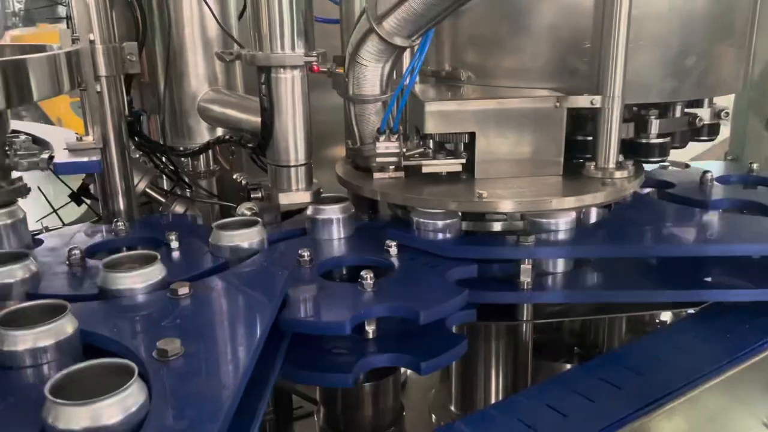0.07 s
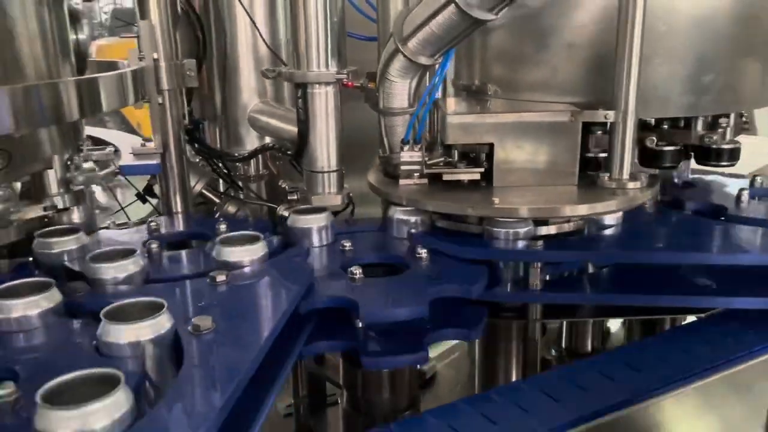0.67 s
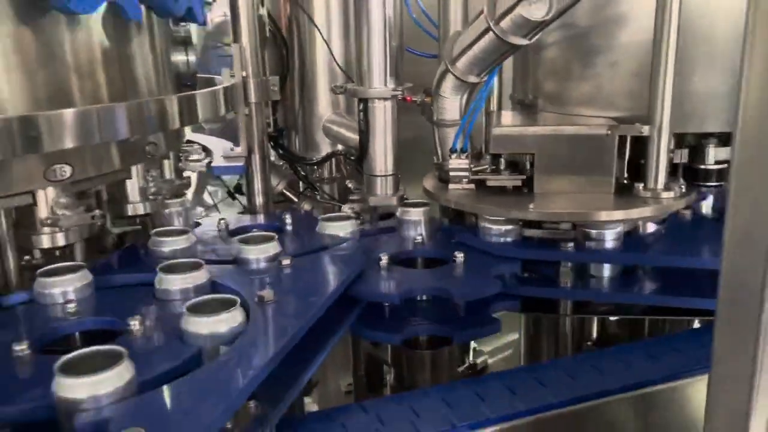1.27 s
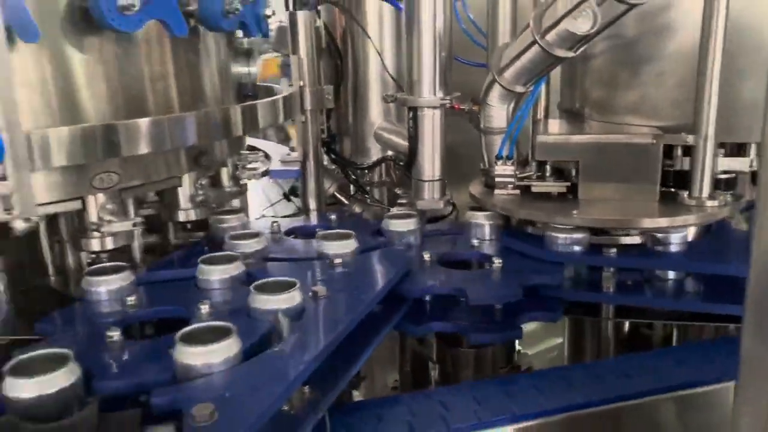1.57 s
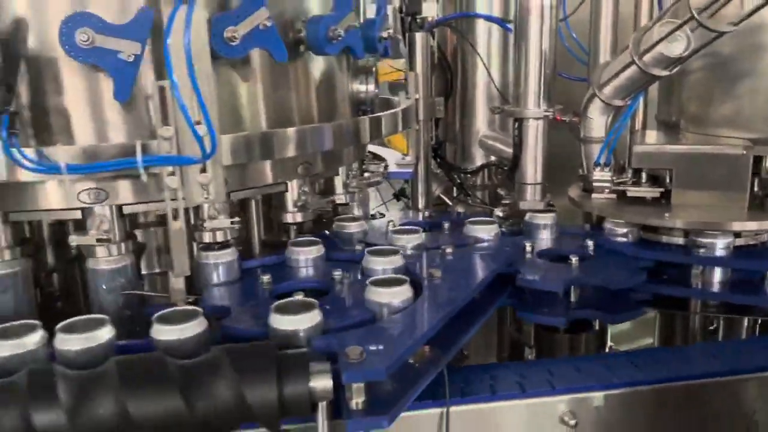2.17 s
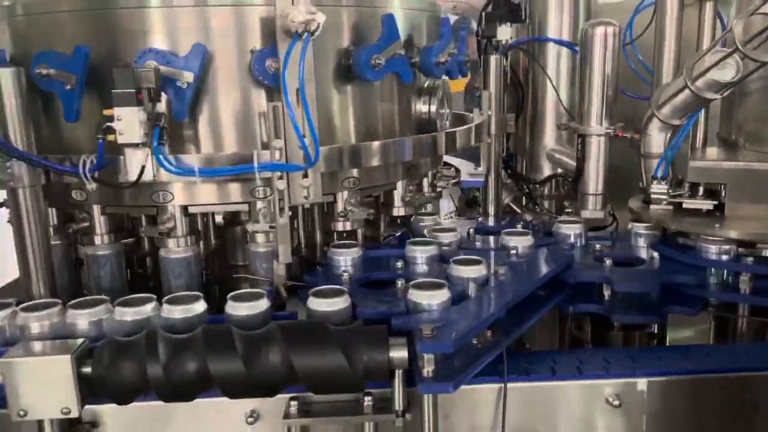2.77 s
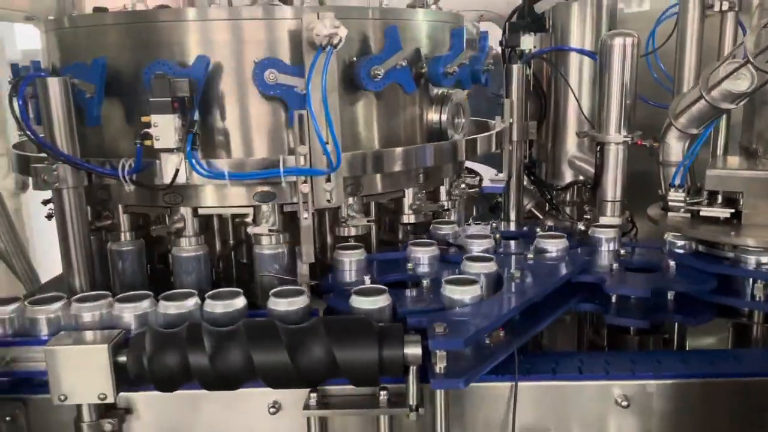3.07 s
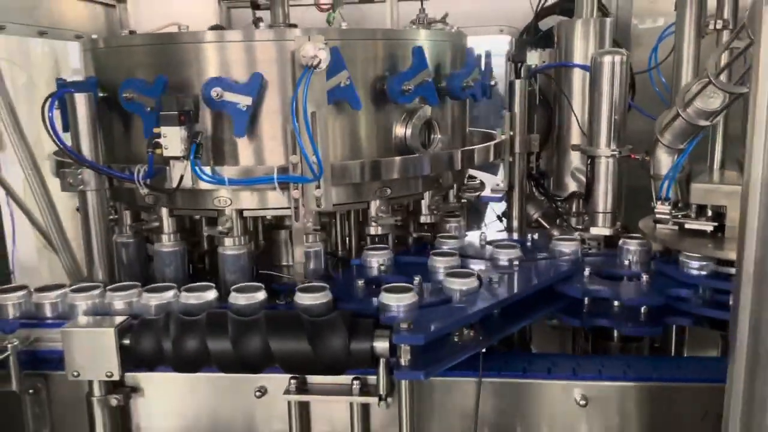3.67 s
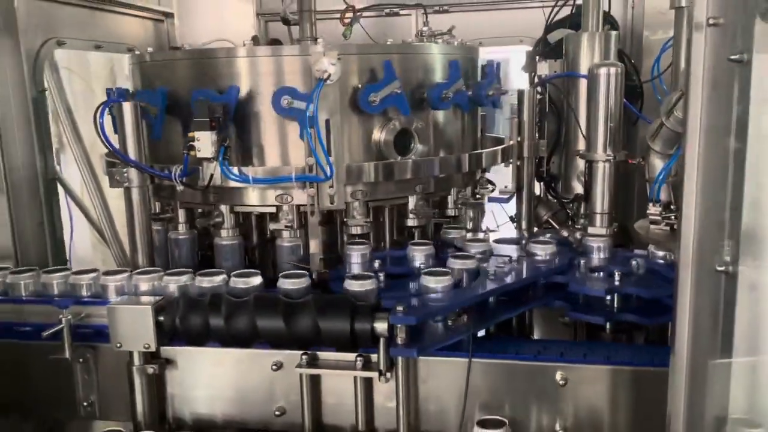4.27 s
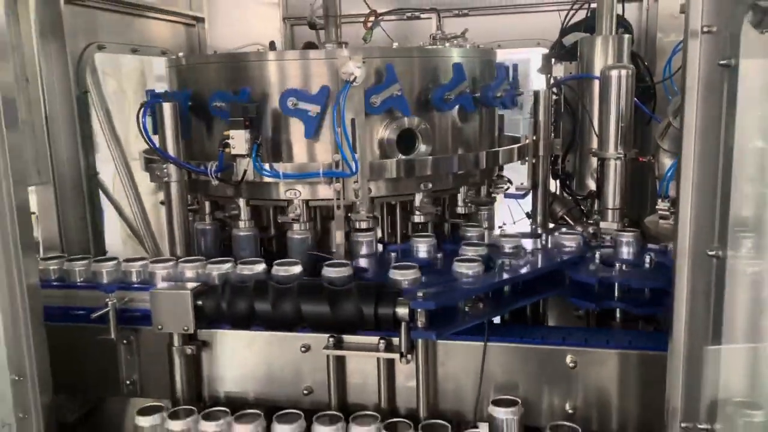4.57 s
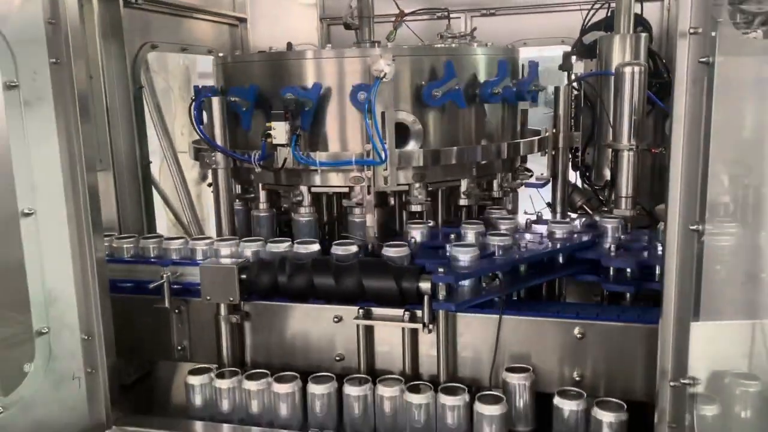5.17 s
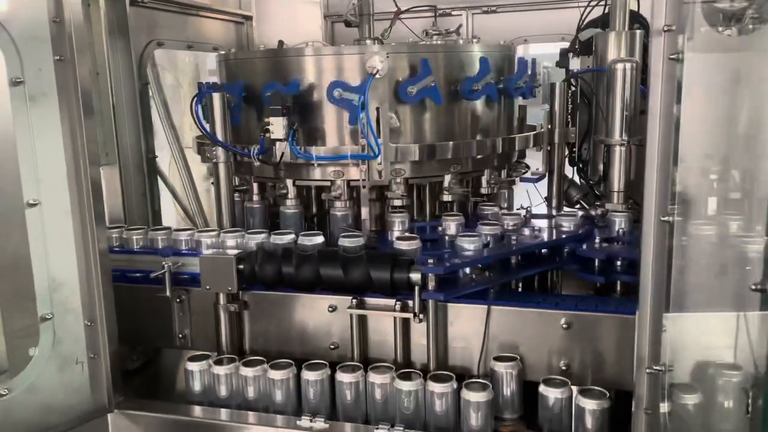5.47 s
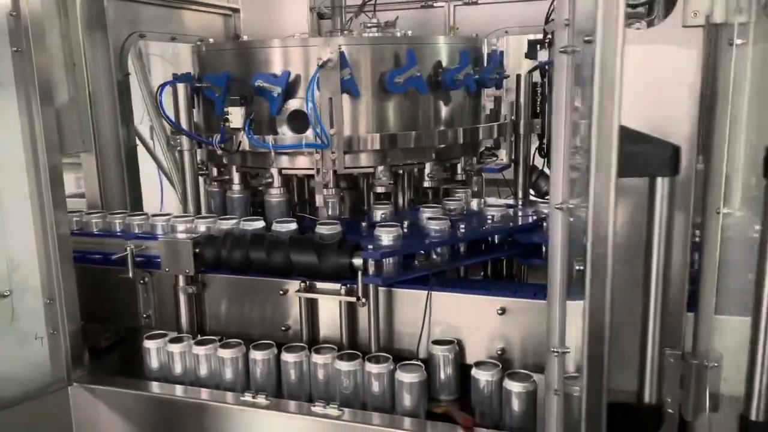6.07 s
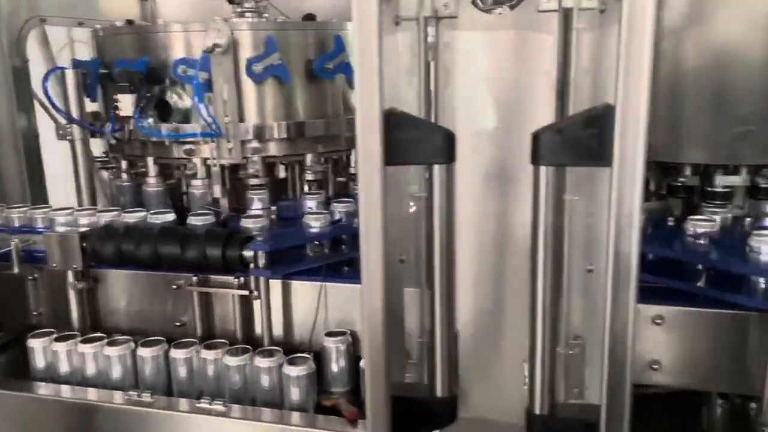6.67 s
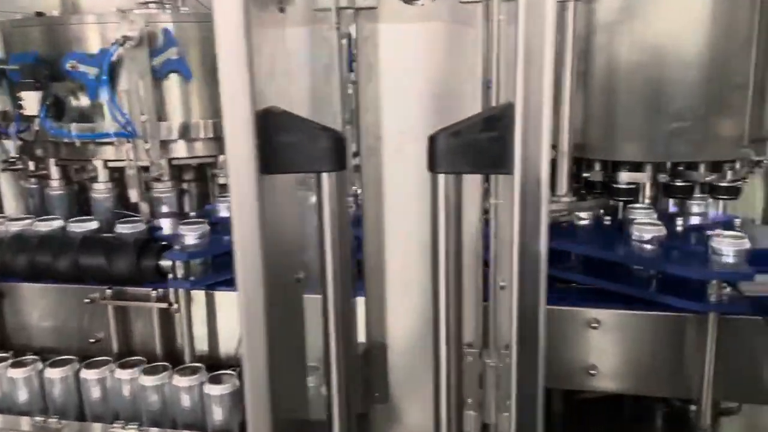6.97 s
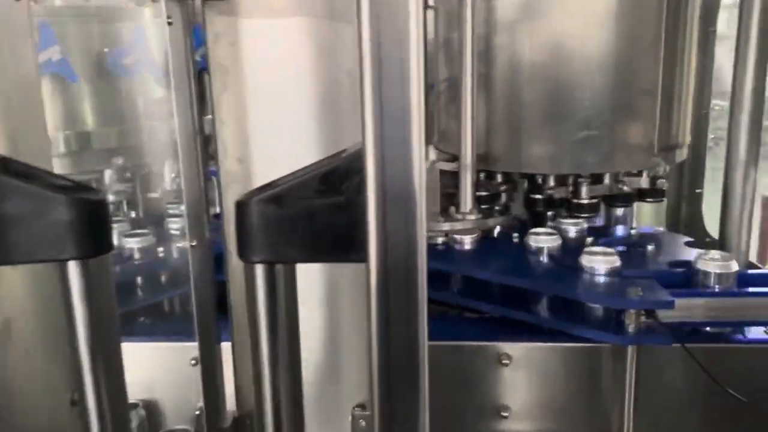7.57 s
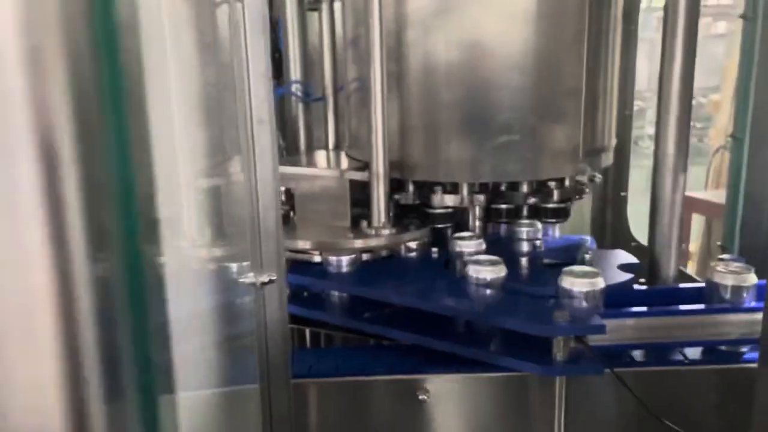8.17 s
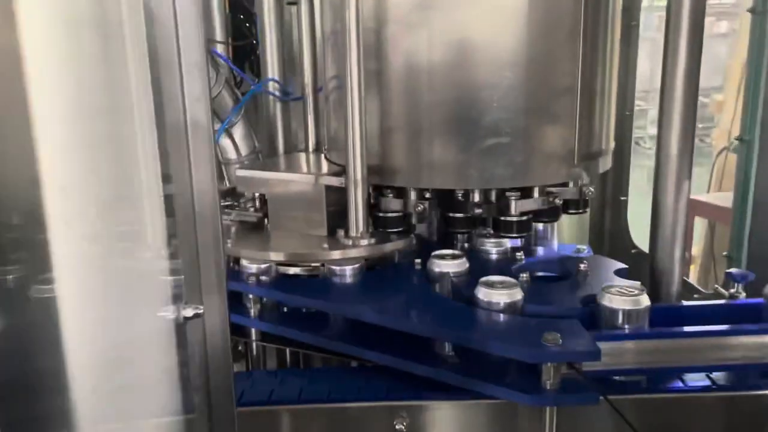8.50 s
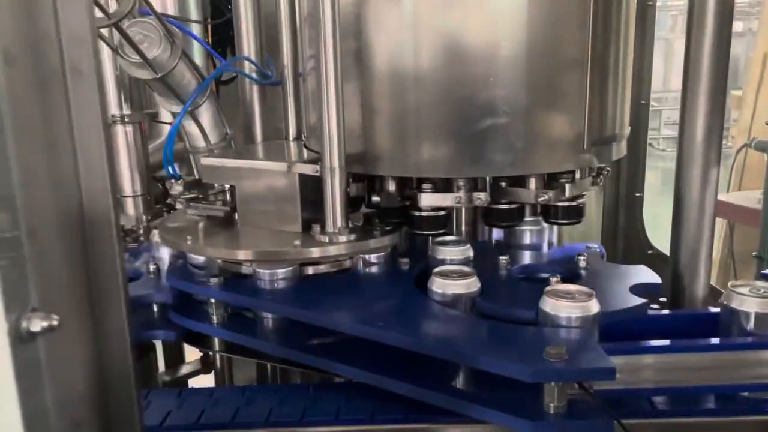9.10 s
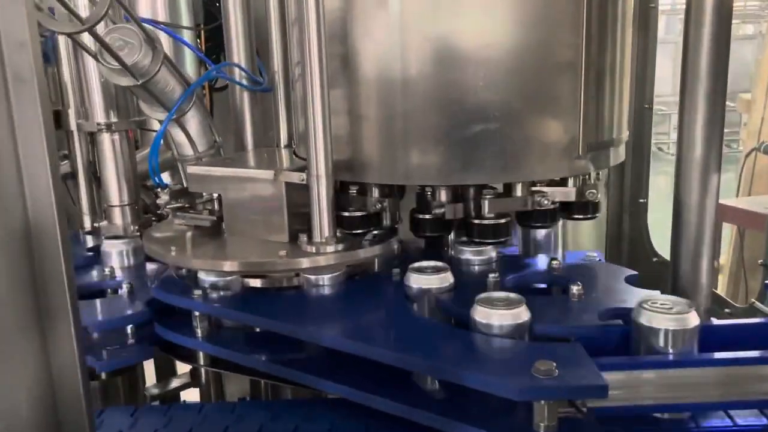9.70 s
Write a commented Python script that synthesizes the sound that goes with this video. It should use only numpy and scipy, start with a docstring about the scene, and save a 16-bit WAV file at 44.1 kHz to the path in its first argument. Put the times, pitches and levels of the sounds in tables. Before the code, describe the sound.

Heard while walking along a canning line in a factory, motors drone and conveyors rumble under a steady airy wash. At first, cans rattle and clink between crisp double spurts of gas, with a high electrical whine above. Later the clinks thin out, the whine recedes and single hisses follow one another closely. Toward the end, rollers sealing the can lids come close with a chattering rasp and a buzzier hum.

```python
"""Walking along a canning line

A rotary can filler and a seamer, which closes the lids, run in a hard-walled factory hall.
The drive drones, swelling and fading between the hall's quiet spots, and its inverters whine.
Star wheels clatter, cans clink and squeak, and valves let out gas in sharp hisses.
Towards the end the seamer is close: the drone grows buzzy and its rolls rasp on the lids."""
import sys
import numpy as np
from scipy import signal
from scipy.fft import rfft, irfft
from scipy.io import wavfile
from scipy.ndimage import uniform_filter1d, map_coordinates

SR = 44100
rng = np.random.default_rng(int(sys.argv[2]) if len(sys.argv) > 2 else 0)


def log_audio(samples):
    """Write samples as a 16-bit WAV file to the path given in sys.argv[1]."""
    # one column per channel
    frames = np.atleast_2d(samples).T
    # limit to full scale, then quantise
    limited = np.clip(frames, -1, 1)
    pcm = np.round(limited * 32767).astype(np.int16)
    wavfile.write(sys.argv[1], SR, pcm)


N = 433944
TIME = np.arange(N) / SR
BINS_HZ = np.fft.rfftfreq(N, 1 / SR)


def gain_of(db):
    """Turns decibels into a number to multiply a sound by."""
    return 10 ** (np.asarray(db) / 20)


def unit_level(x):
    """Scales a signal so that its average level (rms) is one."""
    return x / np.sqrt(np.mean(x ** 2) + 1e-20)


def over_time(rows):
    """Joins the rows of a time table into one curve per column."""
    times, *columns = np.transpose(rows)
    return [np.interp(TIME, times, column) for column in columns]


def over_pitch(rows):
    """Joins the rows of a pitch table into one curve per column."""
    hz, *columns = np.transpose(rows)
    return [np.interp(np.log(BINS_HZ + 1), np.log(hz + 1), column) for column in columns]


def drift(rate_hz):
    """A random wobble of about size one, moving no faster than roughly rate_hz."""
    white = rng.standard_normal(4096)
    hz = np.fft.rfftfreq(len(white), TIME[-1] / len(white))
    slow = unit_level(irfft(rfft(white) / (1 + (hz / rate_hz) ** 4)))
    return np.interp(TIME, np.linspace(0, TIME[-1], len(slow)), slow)


def coloured(x, colour):
    """Gives a sound a colour: its balance of low and high pitches."""
    return unit_level(irfft(rfft(x) * gain_of(over_pitch(colour)[0]), N))


def noise(colour):
    """Two unrelated noises of the same colour."""
    return coloured(rng.standard_normal((2, N)), colour)


def passing(nearest_s, spread_s):
    """The rise and fall in loudness as we walk past something."""
    return np.exp(-0.5 * ((TIME - nearest_s) / spread_s) ** 2)


def add(mix, start_s, sound):
    """Adds a sound to the mix at a given time."""
    sound = np.atleast_2d(sound)
    part = mix[:, max(round(start_s * SR), 0):][:, :sound.shape[1]]
    part += sound[:, :part.shape[1]]


# How fast the main drive turns: time_s, pitch_hz
DRIVE_SPEED = [(0, 63), (2.55, 62.65), (2.9, 60.8), (3.65, 60.74), (4.1, 62.63), (4.8, 64.23), (5.6, 63),
               (6.3, 64.03), (6.7, 66.64), (7.1, 64.1), (7.7, 65.6), (8.4, 66.1), (8.95, 67.7),
               (9.35, 64.8), (9.7, 67.7), (9.84, 68.6)]

def drive_angle():
    """How far the drive shaft has turned, in radians."""
    return 2 * np.pi * np.cumsum(over_time(DRIVE_SPEED)[0]) / SR


# When the walk crosses a quiet spot of the drone: time_s
QUIET_SPOTS = [-0.05, 0.42, 0.94, 1.37, 1.72, 2.72, 4.0, 4.93, 5.85, 6.41, 7.6, 9.6, 10.1]

def quiet_spots(floor=0.0022, steepness=0.31):
    """The lowest note stands as a wave in the hall, so it swells between quiet spots."""
    place = np.interp(TIME, np.sort(QUIET_SPOTS), np.arange(len(QUIET_SPOTS)))
    return (np.sin(np.pi * place) ** 2 + floor) ** steepness


# The drone's notes at 1 to 5 times the drive's pitch, a table each: time_s, level_db
FIRST_HARMONIC = [(0, -29), (1.3, -29.5), (2.3, -18.5), (2.85, -18), (3.35, -25.5), (4.3, -20),
                  (6.2, -22.0), (6.75, -28), (7.4, -20), (8.4, -26), (8.75, -21.5), (9.84, -20)]
SECOND_HARMONIC = [(0, -31), (1.3, -36.5), (1.55, -23.5), (1.72, -35), (2.15, -39), (2.4, -26.5),
                   (2.8, -32.5), (4.35, -33), (4.66, -23), (4.95, -33), (5.85, -39), (6.05, -23.5),
                   (6.35, -33), (8.3, -27.5), (8.6, -18.5), (9.35, -21), (9.66, -17), (9.84, -29)]
THIRD_HARMONIC = [(0, -33), (3.5, -34.5), (4.1, -30.5), (4.5, -46), (4.85, -29.5), (5.22, -28), (5.42, -39),
                  (6.15, -34), (6.8, -38), (7.1, -33), (7.5, -33.5), (8.2, -42.5), (8.95, -29), (9.84, -37)]
FOURTH_HARMONIC = [(0, -40.5), (2.1, -37), (3, -39.5), (4.5, -41.5), (4.9, -34), (5.7, -41), (7.2, -40.5),
                   (7.7, -30), (8.15, -41), (9.84, -36.5)]
FIFTH_HARMONIC = [(0, -50), (1.6, -45), (3.8, -37.5), (4.3, -46), (4.65, -43), (4.9, -31), (5.27, -38.5),
                  (5.55, -34.5), (5.85, -43), (6.25, -33), (6.8, -44), (7.02, -33.5), (7.4, -40),
                  (8.2, -39.5), (8.9, -31.5), (9.3, -41), (9.62, -27.5), (9.84, -39)]
# Extra buzz in the fourth as the rolls bite a lid: time_s, level_db
LID_BITE = [(8.5, -60), (8.75, -39), (8.92, -23), (9.15, -36), (9.52, -40), (9.63, -20.5), (9.84, -25)]
# Higher notes that rise and fall with the fourth: multiple, level_db
HIGH_HARMONICS = [(6, -9), (7, -7.5), (8, -13.5), (9, -11)]

def drone(angle, waver_db=2.1, slip_rad=0.16):
    """The shaft hums at multiples of its speed; the higher notes waver as panels rattle."""
    hum = gain_of(over_time(FIRST_HARMONIC)[0] + 0.25) * quiet_spots() * np.sin(angle)
    second = gain_of(over_time(SECOND_HARMONIC)[0] - 2.5 + waver_db * drift(7))
    hum += second * np.sin(2 * angle + slip_rad * drift(1.4))
    gains = {3: gain_of(over_time(THIRD_HARMONIC)[0] - 1),
             4: np.hypot(gain_of(over_time(FOURTH_HARMONIC)[0]), gain_of(over_time(LID_BITE)[0])),
             5: gain_of(over_time(FIFTH_HARMONIC)[0])}
    for multiple, db in HIGH_HARMONICS:
        gains[round(multiple)] = gains[4] * gain_of(db - 5.5)
    sixth_swell = gain_of(-39.5) * passing(nearest_s=6.18, spread_s=0.75)
    gains[6] = np.hypot(gains[6], sixth_swell)
    for multiple, gain in gains.items():
        waver = gain_of(waver_db * drift(8.9))
        phase = slip_rad * drift(5.6) + 2 * np.pi * rng.random()
        hum += gain * waver * np.sin(multiple * angle + phase)
    return np.sqrt(2) * np.array([hum, hum])


# Loudness of the wheels and conveyors: time_s, level_db
RUMBLE_LEVEL = [(0, -26.5), (1.2, -25.5), (1.65, -24.5), (2.8, -26), (6.8, -26), (8.3, -23), (8.7, -21),
                (9.1, -24), (9.84, -22)]
# Their colour at the filler and at the seamer: pitch_hz, level_db
FILLER_COLOUR = [(25, -55), (45, -4), (80, -0.5), (160, -0.5), (225, -3), (300, -1.5), (370, 0), (425, -4),
                 (550, -1.5), (760, -5), (1020, -7.5), (1300, -13), (2200, -38.5)]
SEAMER_COLOUR = [(25, -36), (45, -7), (80, -3.5), (160, 2), (225, -4.5), (370, -1.5), (500, -1.5),
                 (750, -7.5), (1020, -5), (1400, -17.5), (2200, -44)]
# Dull bumps of the star wheels that pass the cans along: start_s, level_db
WHEEL_BUMPS = [(0.62, -21), (1.722, -26), (3.85, -17), (4.92, -21)]

def rumble(trim_db=1.1, flutter_db=0.94, handover_s=(5.5, 8.5), rise_s=0.0073, fade_s=0.23):
    """Wheels and conveyors rumble and bump; the seamer takes over from the filler as we walk."""
    near_seamer = np.interp(TIME, handover_s, [0, 1])
    body = np.sqrt(1 - near_seamer) * noise(FILLER_COLOUR) + np.sqrt(near_seamer) * noise(SEAMER_COLOUR)
    power = gain_of(over_time(RUMBLE_LEVEL)[0] + trim_db + flutter_db * drift(23)) ** 2
    for start_s, db in WHEEL_BUMPS:
        age = np.clip(TIME - start_s, 0, 1)
        bump = np.minimum(age / rise_s, 1) * gain_of(db - 60 * age / fade_s)
        power += bump ** 2
    return body * np.sqrt(power)


# Colour of the chains and leaking air: pitch_hz, level_db
WASH_COLOUR = [(600, -23), (1200, -8), (1700, -3), (2300, -7.5), (3100, -11), (4200, -12.5), (4750, -13),
               (5550, -14.5), (6100, -10.5), (7400, -13.5), (9500, -21.5), (12000, -18), (14700, -26.5)]
# Their loudness and brightness: time_s, level_db, treble_db
WASH_LEVEL = [(0, -30, 1.5), (1, -32, 1.5), (2, -31.5, 0), (3.2, -31.5, 3.5), (4.2, -32.5, 0),
              (5.6, -31.5, -2), (6.6, -31.5, 2.5), (7.5, -31.5, -1.5), (8.3, -31, 1), (9.84, -36.5, 14)]

def chains_and_air(flutter_db=1.23, treble_hz=7500):
    """Chains and leaking air make a steady wash; the machine's guards shade its treble."""
    level_db, treble_db = over_time(WASH_LEVEL)
    air = noise(WASH_COLOUR)
    treble = irfft(rfft(air) * BINS_HZ ** 4 / (BINS_HZ ** 4 + treble_hz ** 4), N)
    shaded = air + (gain_of(treble_db) - 1) * treble
    return shaded * gain_of(level_db + flutter_db * drift(13))


def thin_tone(hz, right_delay_s=0.00005):
    """A tone that swells and fades in the hall's standing waves and reaches the right side later."""
    angle = 2 * np.pi * (hz * TIME + rng.random())
    sides = []
    for delay_s in (0, right_delay_s):
        swell = gain_of(1.3 * drift(3.5))
        sides.append(swell * np.sin(angle - 2 * np.pi * hz * delay_s + 0.25 * drift(5)))
    return unit_level(np.array(sides))


# Inverter tones before and after the drive changes its switching: pitch_hz, before_db, after_db
INVERTER_TONES = [(3924, -70, -51), (4081, -70, -52), (4840, -58, -66), (7897, -64, -51), (7946, -42, -66),
                  (8048, -35.8, -64), (8107, -60, -51)]
# Thin hiss around the highest tones: pitch_hz, level_db
INVERTER_HISS = [(7700, -40), (7930, -4), (8040, 0), (8180, -3), (8400, -40)]

def inverters(switch_s=4.55, trim_db=-1):
    """The drive's power supplies switch so fast that they whine, loudest as we pass them."""
    before = TIME < switch_s
    nearness = passing(nearest_s=2.3, spread_s=2.4)
    tones = sum(np.where(before, nearness * gain_of(before_db), gain_of(after_db)) * thin_tone(hz)
                for hz, before_db, after_db in INVERTER_TONES)
    hiss = noise(INVERTER_HISS) * np.where(before, nearness * gain_of(-48.5), gain_of(-58))
    return tones * gain_of(trim_db) + hiss


def mains_and_pump(mains_hz=100, pump_hz=753):
    """Mains power hums throughout, and a pump's faint note comes and goes as we pass it."""
    pump = gain_of(-41) * thin_tone(pump_hz) * passing(nearest_s=7.28, spread_s=1.2)
    return pump + gain_of(-45) * thin_tone(mains_hz)


# Ringing machine panels: nearest_s, pitch_hz, width_hz, level_db, spread_s
STEEL_PANELS = [(0.38, 880, 400, -32, 0.13), (0.8, 593, 59, -34, 2.3), (1.9, 940, 69, -32.5, 0.37),
                (2, 1600, 60, -42.5, 0.45), (0.8, 2290, 120, -45, 0.54), (4.2, 920, 71.5, -39.5, 0.47),
                (6.8, 1671, 170, -37, 0.36), (6.5, 3800, 200, -48, 1.0), (6.3, 2570, 180, -49, 1.1),
                (6.85, 920, 380, -39, 0.32), (7.7, 1790, 178, -39, 0.32), (7.9, 890, 300, -32, 0.85),
                (9.7, 1760, 77, -33, 0.4)]

def panels(trim_db=-1, rattle_db=3):
    """Steel panels ring as the line shakes them unevenly, each loudest as we pass it."""
    out = np.zeros((2, N))
    for nearest_s, hz, width_hz, db, spread_s in STEEL_PANELS:
        shake = rfft(rng.standard_normal((2, N)))
        ring = unit_level(irfft(shake / (1 + ((BINS_HZ - hz) / (0.61 * width_hz)) ** 2), N))
        out += ring * gain_of(db + trim_db + rattle_db * drift(21)) * passing(nearest_s, spread_s)
    return out


def shaky_notes(rows, wobble_hz, judder_db, skew=0.63):
    """Brief, unsteady notes that rise fast and fade more slowly."""
    out = np.zeros((1, N))
    for start_s, length_s, hz, db in rows:
        count = int(length_s * SR)
        wobble = unit_level(uniform_filter1d(rng.standard_normal(SR), 130))[:count]
        tone = np.sin(2 * np.pi * np.cumsum(hz + wobble_hz * wobble) / SR)
        swell = np.sin(np.pi * np.linspace(0, 1, count) ** skew) ** 2
        judder = gain_of(judder_db * drift(50)[:count])
        add(out, start_s, gain_of(db) * unit_level(tone * swell * judder))
    return out


# Cans rubbing along the guides: start_s, length_s, pitch_hz, level_db
CAN_SQUEAKS = [(0.0, .35, 4300, -52), (0.052, 0.47, 5190, -55), (0.52, 0.27, 2300, -44),
               (1.68, 0.8, 4447, -50.5), (2.87, 0.3, 1915, -46), (5.35, 0.28, 2003, -43.5),
               (7.84, .04, 4540, -41)]

def squeaks():
    """A can squeaks as it slips along a guide rail."""
    return shaky_notes(CAN_SQUEAKS, wobble_hz=9, judder_db=2)


# The notes a can rings with: pitch_hz, level_db
CAN_NOTES = [(1020, 15), (1590, 6.5), (1950, -2), (2270, -7), (2520, 2), (2950, 4), (3400, 4), (3850, -1),
             (4400, -2), (5200, -8)]

def clink(hz, top_hz, fade_s, rattle_s, taps=4, tap_s=0.005, rebound=0.73, hall_fade_s=0.43):
    """A few quick taps and a can's ring, strongest near hz, with a short wash from the hall."""
    t = np.arange(SR // 4) / SR
    note_hz, note_db = np.transpose(CAN_NOTES)
    note_hz = note_hz * (1 + 0.021 * rng.standard_normal(len(note_hz)))  # no two cans ring alike
    strength = gain_of(note_db) / (1 + (np.log2(note_hz / hz) / 0.38) ** 2)
    phase = rng.random((2, len(note_hz), 1))
    notes = strength[:, None] * np.sin(2 * np.pi * (note_hz[:, None] * t + phase))
    ring = unit_level(notes.sum(1)) * gain_of(-60 * t / fade_s)
    band = signal.butter(2, [min(hz, top_hz) / 2.8, top_hz], "band", fs=SR)
    grit = unit_level(signal.lfilter(*band, rng.standard_normal((2, len(t)))))
    gaps_s = (0.5 + rng.random(taps)) * rattle_s / taps
    contacts = sum((t >= at_s) * rebound ** k * np.exp(-abs(t - at_s) / tap_s)
                   for k, at_s in enumerate(np.cumsum(gaps_s) - gaps_s[0]))
    hall = gain_of(-14 - 60 * t / hall_fade_s)
    soften = signal.butter(8, top_hz, fs=SR, output="sos")  # a soft tap has a low top_hz
    return signal.sosfilt(soften, ring + grit * (1.12 * contacts + hall))


# Cans rattling against the guides: start_s, level_db, pitch_hz, top_hz, rattle_s
CAN_RATTLES = [(0.622, -16, 2266, 5000, 0.027), (0.9547, -18, 1880, 3300, .03),
               (1.0695, -15.5, 2343, 6000, .03), (1.445, -19, 2940, 4000, .012),
               (1.724, -12.5, 1700, 4700, .011), (1.7799, -18, 1967, 3400, .014),
               (2.098, -18, 2530, 4800, 0.033), (2.222, -18, 3850, 4500, .02),
               (2.2384, -19.5, 3400, 4900, .025), (2.8849, -16.5, 2270, 3800, .008),
               (3.248, -15.5, 2300, 3300, .022), (3.748, -18, 3450, 5000, 0.022),
               (4.0684, -19, 3020, 4200, .02), (4.44, -23, 2510, 4000, .02),
               (4.529, -15.5, 1900, 6000, .03), (5.1764, -19, 1648, 3200, 0.018),
               (7.446, -21, 1230, 2800, .02)]

def cans(trim_db=-13, jostles=90):
    """Cans knock loudly on the guides and jostle lightly on the conveyor."""
    out = np.zeros((2, N))
    for start_s, db, hz, top_hz, rattle_s in CAN_RATTLES:
        add(out, start_s, gain_of(db + trim_db) * clink(hz, top_hz, fade_s=0.14, rattle_s=rattle_s))
    for when, pitch, size in rng.random(size=(jostles, 3)):
        jostle = clink(1600 + 3500 * pitch, top_hz=6000, fade_s=0.062, rattle_s=0.02)
        add(out, when * TIME[-1], gain_of(-47.5 + 6 * size) * jostle)
    return out


def valve_flow(start_s, db, opening_s, hold_s, linger=1):
    """Gas through one valve: it opens, holds, then dies ever faster as the valve shuts."""
    age = TIME - start_s
    opened = np.clip(age / opening_s, 0, 1)
    closing_s = np.maximum(age - opening_s - hold_s, 0)
    tail = linger * 0.5 * 2 ** ((db + 30.5) / 9)  # a stronger blow takes longer to die
    pace = 0.75 + closing_s / 0.54
    drop_db = np.minimum(60 * pace * closing_s / tail, 200)
    return opened * gain_of(db - drop_db)


# The filler's double puffs, a short spit and then the main blow: start_s, level_db, hold_s
DOUBLE_PUFFS = [(0.269, -24.5, 0.038), (1.44, -25, 0.025), (2.565, -27, 0.027), (3.745, -30.5, 0.12)]
# Single releases of gas: start_s, level_db, opening_s, hold_s
SINGLE_VENTS = [(4.87, -31, 0.019, 0.14), (5.845, -37, 0.013, 0.15), (5.96, -27.5, 0.14, 0.038),
                (6.479, -33, 0.004, 0.12), (6.874, -34.5, 0.0061, 0.14), (7.098, -38, 0.01, 0.018),
                (7.182, -31, 0.0074, 0.12), (7.619, -33, 0.032, 0.13), (8.083, -35.5, 0.0059, 0.19),
                (8.193, -27.5, 0.065, 0.01), (8.5, -30, 0.068, 0.25), (8.751, -26.5, 0.15, 0.064),
                (9.308, -32, 0.012, 0.28), (9.54, -27.5, 0.12, 0.21)]
# Colours of the jet's low hiss and high hiss: pitch_hz, level_db
JET_LOW = [(700, -27), (1500, -3), (2400, -3.5), (2800, 2), (3500, 0), (4300, 2.5), (4650, 1), (5000, 3.5),
           (5550, -3), (6100, 1.5), (7500, 0.5), (8400, 0), (11000, -32)]
JET_HIGH = [(4000, -16), (6500, -2.5), (8500, 5), (10000, 5.5), (11500, 3), (13000, 2), (14700, 4.5),
            (16000, -4)]

def vents(opening_s=0.011, blow_after_s=0.069, sputter_db=0.93):
    """Gas jets out of the valves with a sputtering hiss, part low and part high."""
    # Each flow is paired with a boost or cut, in dB, for its low hiss.
    flows = [(valve_flow(*row), -2) for row in SINGLE_VENTS]
    for start_s, db, hold_s in DOUBLE_PUFFS:
        spit = valve_flow(start_s, db - 3.5, opening_s, hold_s=0.023, linger=0.7)
        blow = valve_flow(start_s + blow_after_s, db, opening_s, hold_s, linger=1.2)
        flows += [(spit, -7), (blow, 0.55)]
    high = np.sqrt(sum(flow ** 2 for flow, _ in flows))
    low = np.sqrt(sum((flow * gain_of(low_db)) ** 2 for flow, low_db in flows))
    jet = gain_of(-0.5) * low * noise(JET_LOW) + gain_of(2) * high * noise(JET_HIGH)
    return jet * gain_of(sputter_db * drift(39))


# Sharp snaps of the valves: start_s, level_db
VALVE_SNAPS = [(0.342, -16), (1.0675, -18), (1.452, -16), (2.1565, -27), (2.2217, -27), (2.582, -22),
               (2.6383, -17), (3.7574, -21), (4.565, -30), (6.4644, -28), (6.8713, -31), (7.1886, -18),
               (8.0865, -34)]

def snaps(trim_db=-6, fade_s=0.11):
    """A valve's seal lets go with a very short spit of gas."""
    flow = np.zeros((1, N))
    t = np.arange(SR // 8) / SR
    for start_s, db in VALVE_SNAPS:
        add(flow, start_s, gain_of(db + trim_db - 60 * t / fade_s))
    return flow * noise(JET_HIGH)


# Cans that are just grazed: start_s, rise_s, pitch_hz, level_db
CAN_PINGS = [(1.098, .012, 2500, -34), (2.232, .01, 2500, -33), (6.428, 0.033, 3284, -31),
             (6.874, .008, 3360, -39)]

def pings(fade_s=0.2):
    """One clean note builds up while a can is grazed, then dies away."""
    out = np.zeros((1, N))
    t = np.arange(SR // 3) / SR
    for start_s, rise_s, hz, db in CAN_PINGS:
        rise = np.minimum(t / rise_s, 1) ** 2
        fade = gain_of(db - 60 * np.maximum(t - rise_s, 0) / fade_s)
        add(out, start_s, np.sqrt(2) * rise * fade * np.sin(2 * np.pi * hz * t))
    return out


# Vents that whistle: start_s, length_s, pitch_hz, level_db
VENT_WHISTLES = [(5.96, 0.099, 14700, -35), (6.467, 0.08, 14600, -41), (6.87, 0.05, 14500, -43)]

def whistles():
    """Gas whistles thinly through a valve as it opens."""
    return shaky_notes(VENT_WHISTLES, wobble_hz=160.1, judder_db=2.5)


# Loudness of the rolls that close the lids: time_s, level_db
RASP_LEVEL = [(0, -64), (6, -67), (6.7, -33), (7.3, -44), (8.48, -37), (8.57, -27.5), (8.75, -27.5),
              (8.93, -23), (9.1, -28.5), (9.3, -31.5), (9.52, -34.5), (9.62, -25.5), (9.84, -24)]
# Colour of their rasp: pitch_hz, level_db
RASP_COLOUR = [(150, -20), (320, 6.5), (600, 0), (900, -2.5), (1200, 0), (1450, 2), (1850, 4), (2200, 0.5),
               (2550, 1), (3300, -5.5), (3800, -7), (4400, -6), (5000, -13), (7000, -43)]

def seamer(angle, trim_db=-0.5, chatter=0.15, buzz_db=-8, grab_db=0.95):
    """Rolls grab and rub the lid seams, chattering and tapping once per turn of the drive."""
    taps = np.diff(np.floor(angle / (2 * np.pi)), prepend=0)
    t = np.arange(SR // 25) / SR
    housing_knock = rng.standard_normal((2, len(t))) * np.exp(-t / 0.01)
    buzz = coloured(signal.oaconvolve(taps[None], housing_knock, axes=1)[:, :N], RASP_COLOUR)
    rub = noise(RASP_COLOUR) * (1 + chatter * np.cos(angle))
    level_db = over_time(RASP_LEVEL)[0] + trim_db + grab_db * drift(25)
    return (rub + gain_of(buzz_db) * buzz) * gain_of(level_db)


def standing_waves(x, depth_db, spacing_hz, step_s, lowest_hz=600):
    """Echoes between steel surfaces favour some pitches, and the pattern shifts as we walk."""
    hz, times, spectrum = signal.stft(x, SR, nperseg=2048)
    pattern = rng.standard_normal((128, 4096))
    place = np.meshgrid(times / step_s, hz / spacing_hz)
    ripple = unit_level(map_coordinates(pattern, place, order=1, mode="wrap"))
    reach = hz ** 2 / (hz ** 2 + lowest_hz ** 2)  # long, low waves bend round the parts
    gain = unit_level(gain_of(depth_db * ripple * reach[:, None]))
    return signal.istft(spectrum * gain, SR, nperseg=2048)[1][:, :N]


# How alike the microphone's two openings hear: pitch_hz, likeness (0 to 1), left_lead_rad
STEREO_LIKENESS = [(60, 0.98, 0.09), (254, 0.87, 0.2), (533, 0.61, 0.58), (970, 0.45, 0.77),
                   (1590, 0, 3.25), (1860, 0.99, 4.52), (2370, 0.42, 5.86), (2770, 0.6, 7.9),
                   (3450, 0, 6.7), (3840, 0.52, 5.5), (4680, 0.53, 7.72), (5280, 0.6, 7.3),
                   (6020, 0.03, 10.6), (6850, 0.73, 14.5), (7000, 0.5, 8.9), (7770, 0.47, 11),
                   (8160, 1, 9.5), (10370, 1, 8.24), (11400, 0.8, 7.84), (12500, 1, 6.35)]

def left_and_right(x):
    """The two sides hear the hall alike in the bass and out of step in the treble."""
    likeness, lead_rad = over_pitch(STEREO_LIKENESS)
    left, unrelated = rfft(x)
    right = likeness * np.exp(-1j * lead_rad) * left + np.sqrt(1 - likeness ** 2) * unrelated
    return irfft(np.array([left, right]), N)


def scene():
    """The whole line in stereo; one shaft times both the drone and the seamer."""
    angle = drive_angle()
    machinery = rumble() + chains_and_air() + seamer(angle)
    machinery = standing_waves(machinery, depth_db=2.6, spacing_hz=42, step_s=0.4) + panels()
    gas = standing_waves(vents(), depth_db=0.9, spacing_hz=110, step_s=0.2)
    tones = drone(angle) + squeaks() + pings() + whistles() + inverters() + mains_and_pump()
    return tones + left_and_right(machinery + gas + snaps() + cans())


# How much more the left side picks up than the right: pitch_hz, left_minus_right_db
STEREO_BALANCE = [(60, -2), (140, -1.7), (300, -1), (550, 1.5), (1100, 4), (2000, 0.5), (5200, 1),
                  (7000, -0.5)]

def record(dry, top_hz=15900):
    """The microphone's two sides are unevenly sensitive, and the highest treble is cut off."""
    balance = gain_of(np.outer([0.5, -0.5], over_pitch(STEREO_BALANCE)[0]))
    heard = irfft(rfft(dry) * balance, N)
    treble_cut = signal.firwin(511, top_hz, window=("kaiser", 9), fs=SR)
    return signal.oaconvolve(heard, treble_cut[None], "same")


dry = scene()
out = record(dry)
log_audio(out)
```